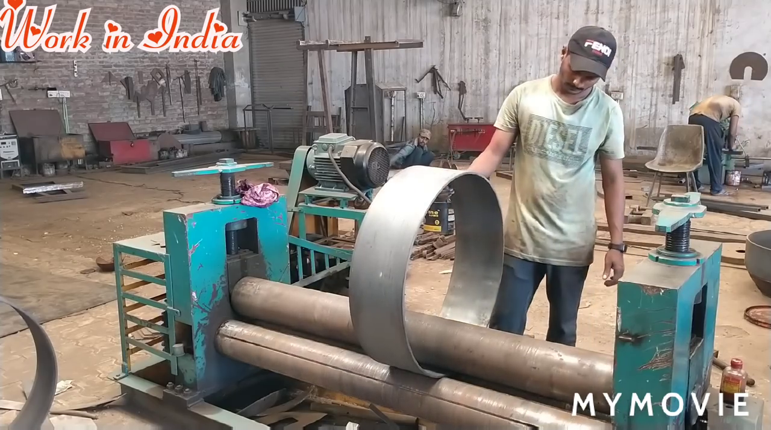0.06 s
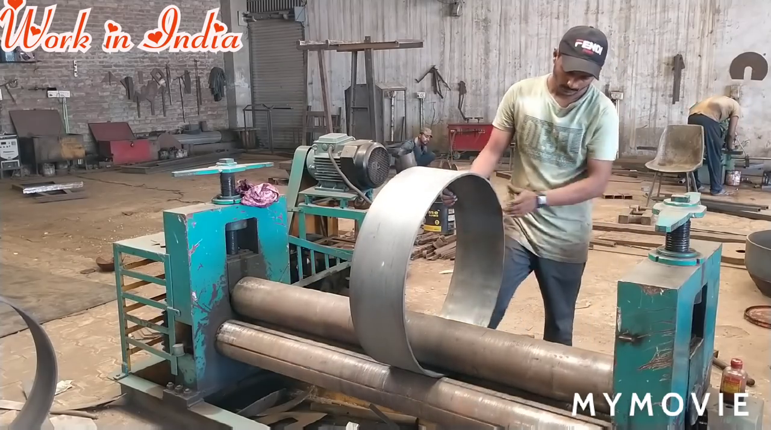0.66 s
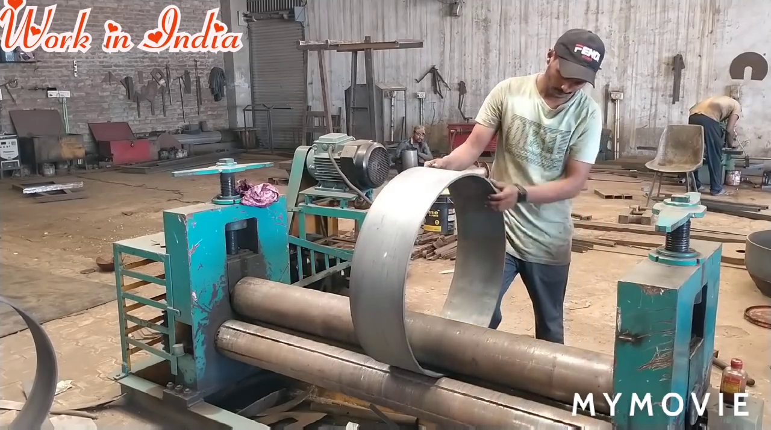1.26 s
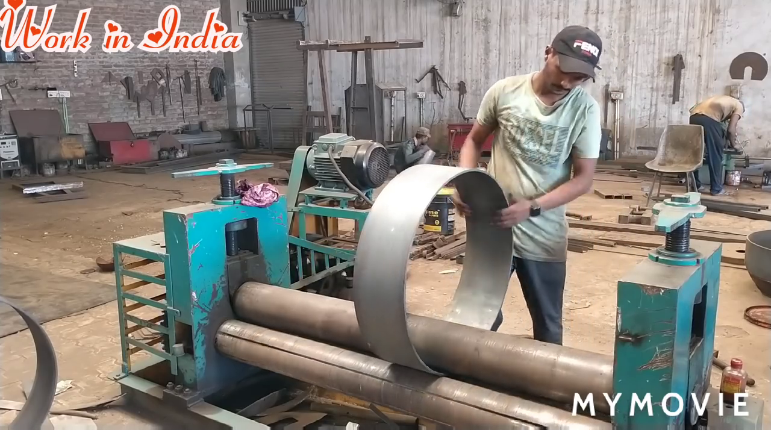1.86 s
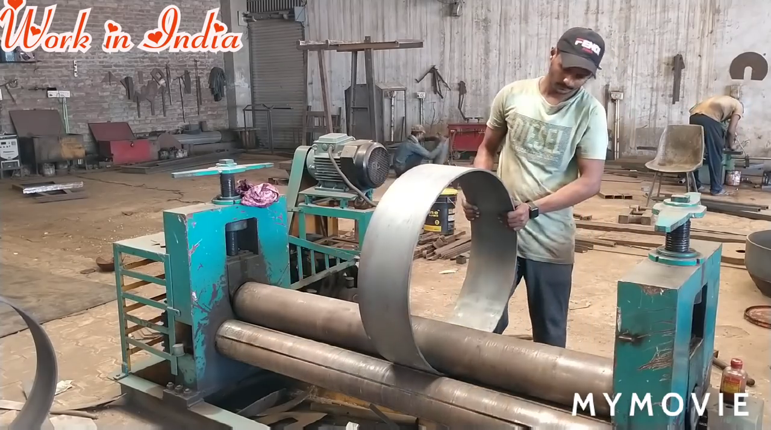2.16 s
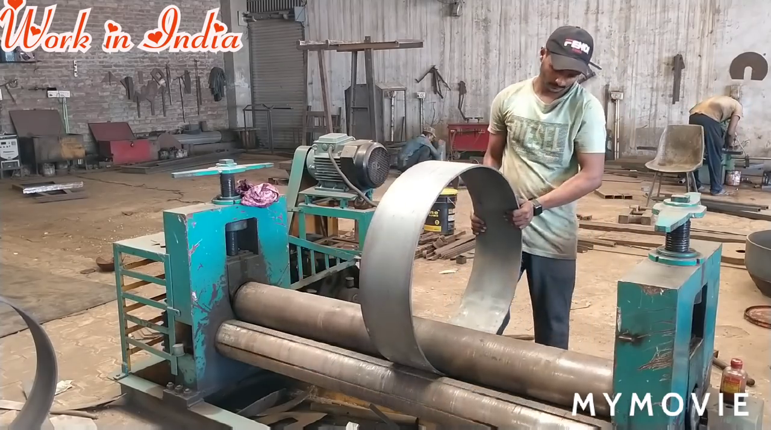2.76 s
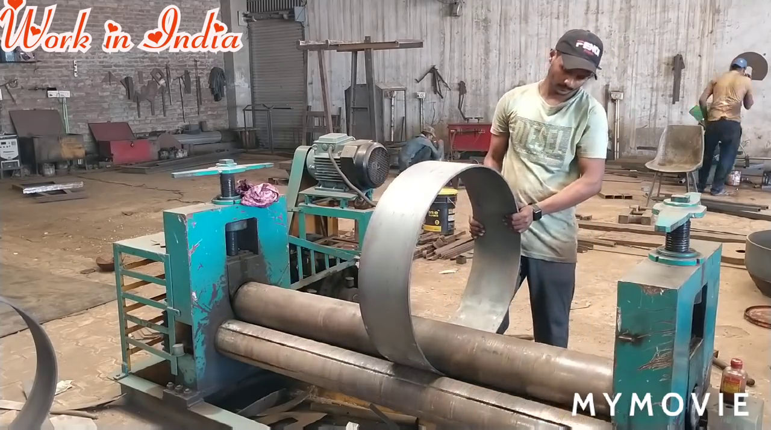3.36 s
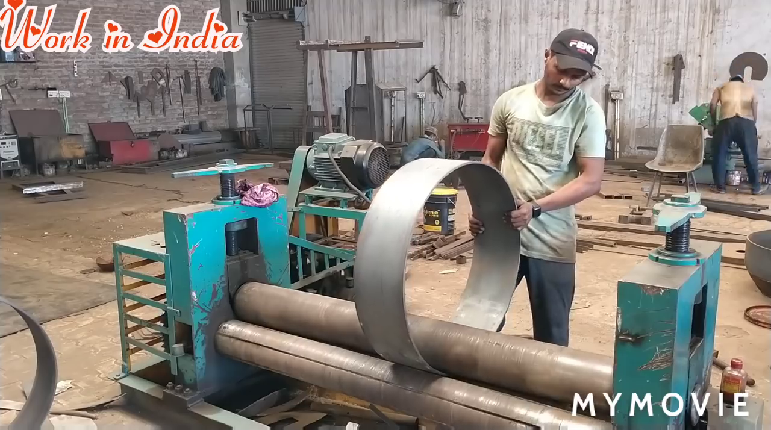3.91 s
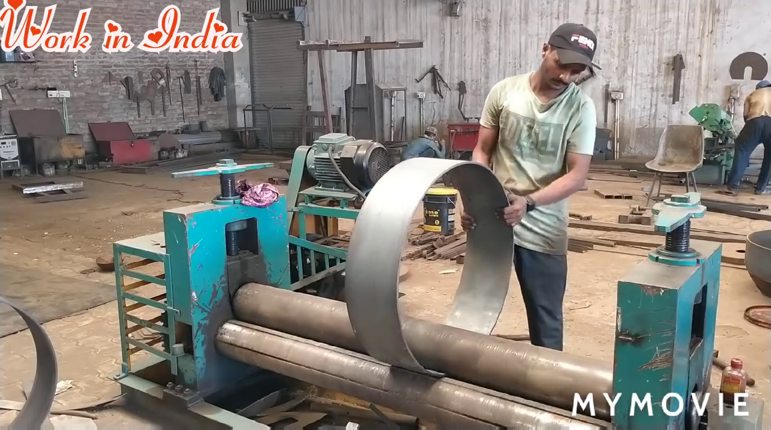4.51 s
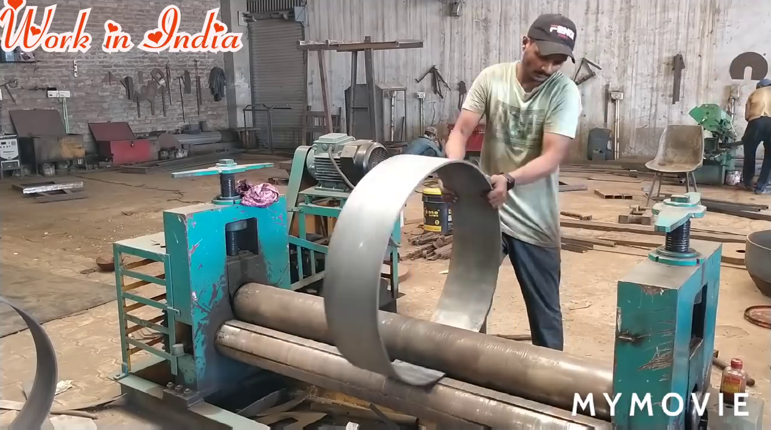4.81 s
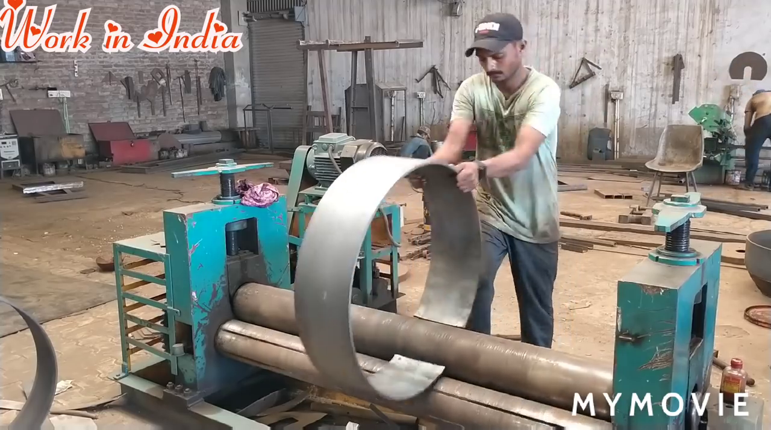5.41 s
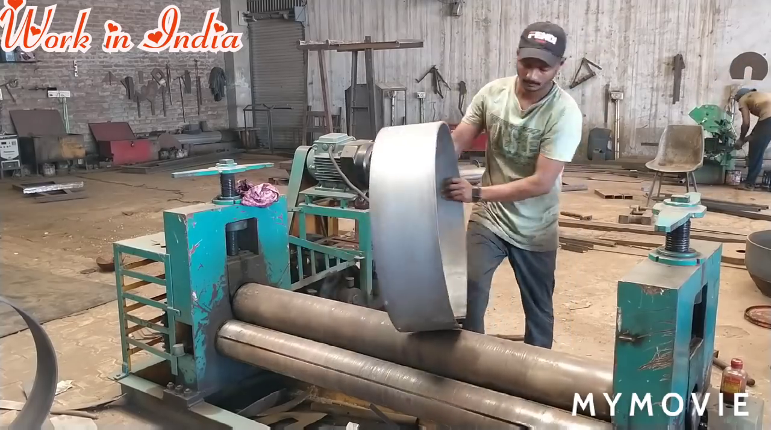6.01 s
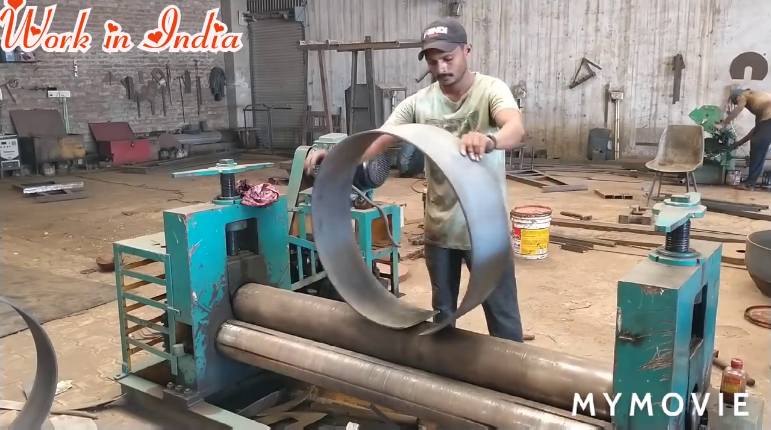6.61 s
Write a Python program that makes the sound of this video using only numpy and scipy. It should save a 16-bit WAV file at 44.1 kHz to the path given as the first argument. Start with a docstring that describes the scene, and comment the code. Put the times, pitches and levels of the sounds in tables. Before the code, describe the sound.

In a large, reverberant workshop, a steel bar clinks and rattles lightly several times. After a short pause, sheet and plate steel clatter in a louder run of ringing clanks. A steel hoop then knocks on machine rollers with a dull thud, bangs against them again, and is dragged round with thin, high, stuttering squeaks. Distant machinery hums faintly throughout, all heard in mono.

```python
"""Steel stock clanks in quick runs as it is dropped and stacked in a fabrication workshop.
Each impact excites the normal modes of the piece, which chatters and then rings in damped free vibration.
A rolled hoop knocks on the bending rollers, drops onto them and is dragged round, squealing thinly by
stick-slip friction. A large shed adds its diffuse reverberation over a low machine hum."""
import sys
import numpy as np
from scipy import signal
from scipy.fft import rfft, irfft
from scipy.io import wavfile
from scipy.ndimage import uniform_filter1d, minimum_filter1d

SR = 44100
rng = np.random.default_rng(int(sys.argv[2]) if len(sys.argv) > 2 else 0)


def master_out(mix):
    """Clip the mix to full scale and print it as 16-bit PCM to the path in sys.argv[1]."""
    frames = np.transpose(np.atleast_2d(mix))
    ceiling = np.clip(frames, -1, 1)
    pcm = np.round(ceiling * 32767).astype(np.int16)
    wavfile.write(sys.argv[1], SR, pcm)


N = 294572
TIME = np.arange(N) / SR
BLOW = TIME[:2 ** 15]  # time axis of one impact, t/s
ATTACK_S = .0115

# Strongest normal modes of each piece: f/Hz, relative level/dB
BAR_MODES = [(1073, -17.5), (2106, -10.5), (2614, 2.5), (3035, -19), (3281, -13), (3524, -12), (3560, -4),
             (5195, -9.5), (5313, -5.5), (6397, -21), (7563, -15), (7639, -15), (8107, -20), (8482, -16)]
STRIP_MODES = [(1851, -16.5), (2062, -12), (2110, -10.5), (2414, -11.5), (2609, -8.5), (3033, -5.5),
               (3073, -10), (3515, -4.5), (3559, -1.5), (4358, -14), (4870, -11), (5204, -10.5),
               (5848, -18.5), (6388, -13)]
SHEET_MODES = [(527, -12), (561, -14), (1248, -4), (1694, -6), (1727, -5.5), (1914, -4), (2172, -2),
               (2208, -3), (2502, -8), (2621, -5), (2855, -14), (3333, -1.5), (3594, -5), (4814, -6.5),
               (5150, -6.5), (5967, -12.5), (6353, -10), (6838, -5.5), (6877, -9.5), (6918, -8),
               (7503, -1.5), (7709, -6), (7760, -9), (8239, -14), (8523, -11.5), (9145, -10)]
PLATE_MODES = [(889, -10), (1480, 3), (1565, -2.5), (1620, -3), (1813, -2), (1862, -16), (2117, -0.5),
               (2225, -12), (2401, -14), (2431, -8.5), (2706, -7.5), (2781, -6), (2916, -8.5), (3119, -13),
               (3447, -3.5), (3502, -9), (3560, -7.5), (3736, -13.5), (4251, -9), (4394, -9.5), (5631, -21),
               (6556, -17)]
ROLLER_MODES = [(315, -30), (560, -11), (684, -7), (870, -6), (1164, 0), (1264, -4.5), (1561, -16),
                (1631, -9), (1699, -11), (1731, -0.5), (1961, -13), (2450, -19), (2601, -8), (3238, -16),
                (3403, -15), (3670, -22), (4567, -19), (5249, -26)]
HOOP_MODES = [(634, -22), (1136, -15.5), (1579, -18.5), (1617, -2.5), (1880, -7.5), (1938, -13),
              (2246, -11), (2281, -2.5), (2475, -3.5), (2594, -16), (2637, -11), (2669, 0), (2794, -3.5),
              (2862, -5), (3100, -13), (3248, -8.5), (3386, -9.5), (3550, -12), (3579, -16), (3813, -8.5),
              (3932, -10), (4322, -16), (4510, -16.5), (5413, -20), (5700, -26), (6280, -17.5), (6633, -21),
              (7310, -14), (7612, -14), (7661, -22)]
# Continuum of weak, overlapping modes of each piece: f/Hz, relative spectral level/dB
BAR_CONTINUUM = [(100, -22.5), (250, -13.5), (550, -16.5), (1000, -23), (1600, -13), (2400, -1.5),
                 (3500, 0), (5000, -8.5), (7500, -4.5), (9500, -16), (12000, -34.5), (15000, -46)]
STRIP_CONTINUUM = [(100, -45.5), (250, -25), (550, -19), (1000, -16.5), (1600, -15.5), (2400, -9.5),
                   (3500, -0.5), (5000, -16), (7500, -7), (9500, -20.5), (12000, -46.5), (15000, -52)]
SHEET_CONTINUUM = [(100, -44.5), (250, -21), (550, -4.5), (1000, -5), (1600, -5.5), (2400, -6.5),
                   (3500, -1), (5000, -6), (7500, -6.5), (9500, -18), (12000, -35), (15000, -48.5)]
PLATE_CONTINUUM = [(100, -34), (250, -19), (550, -4), (1000, -9), (1600, -9.5), (2400, 2.5), (3500, -3.5),
                   (5000, -5.5), (7500, -4.5), (9500, -15), (12000, -36), (15000, -48.5)]
ROLLER_CONTINUUM = [(100, -47), (250, -17), (550, -6.5), (1000, -23), (1600, 2), (2400, 1), (3500, -4),
                    (5000, -11), (7500, -10.5), (9500, -21.5), (12000, -38), (15000, -47)]
HOOP_CONTINUUM = [(100, -26.5), (250, -28), (550, -15.5), (1000, -7), (1600, -8.5), (2400, 1), (3500, -2.5),
                  (5000, -7.5), (7500, -9.5), (9500, -20.5), (12000, -42), (15000, -51)]
STEEL = {"bar": (BAR_MODES, BAR_CONTINUUM), "strip": (STRIP_MODES, STRIP_CONTINUUM),
         "sheet": (SHEET_MODES, SHEET_CONTINUUM), "plate": (PLATE_MODES, PLATE_CONTINUUM),
         "roller": (ROLLER_MODES, ROLLER_CONTINUUM), "hoop": (HOOP_MODES, HOOP_CONTINUUM)}


def clank(piece, crash_db, ring_db, bass_db, treble_db, chatter, t60, rattle_db=1.58, bounce_db=1.31):
    """Modal superposition: dense weak modes merge into a crash, and the strong modes ring through it."""
    modes, continuum = STEEL[piece]
    size = len(BLOW)
    tilt = [(500, bass_db), (2500, 0), (7500, treble_db)]  # set by the place and hardness of contact
    grid_hz = np.arange(0, SR / 2, 55)
    ripple_db = 5 * rng.standard_normal(len(grid_hz))  # peaks and valleys of the weak modes
    crash = noise(
        lambda f: spectrum_db(continuum, f) + spectrum_db(tilt, f) + np.interp(f, grid_hz, ripple_db),
        size)
    crash = butterworth(crash, 4, 115, "high")  # thin steel radiates hardly any deep bass
    ring = unit(sum(amp(db + spectrum_db(tilt, hz)) * mode(hz) for hz, db in modes))
    rattle = amp(rattle_db * wander(300, size))
    bounce = amp(bounce_db * wander(90, size))
    rise = ATTACK_S + .035 * chatter  # a piece that chatters longer settles more slowly
    crash = damp(unit(crash * rattle), rise, chatter, t60)
    ring = damp(ring, rise, chatter, 1.12 * t60)
    return (amp(crash_db) * crash + amp(ring_db) * ring) * bounce


def damp(x, rise, chatter, t60, treble_t60_ratio=.82):
    """Frequency-dependent damping: the shortest bending waves die first."""
    body = signal.sosfiltfilt(signal.butter(2, 5000, fs=SR, output="sos"), x)
    treble = (x - body) * envelope(BLOW, rise, chatter, t60 * treble_t60_ratio)
    return body * envelope(BLOW, rise, chatter, t60) + treble


# Impacts of steel on steel: piece, t/s, crash level/dB, ring level re crash/dB, bass tilt/dB,
# treble tilt/dB, chatter/s, T60/s, f/Hz picked out by a grazing edge (None for a flat landing)
IMPACTS = [ ("bar", 0.000, -38.5, -7, 0, -12, .007, .22, 4320),
           ("bar", 0.042, -37.5, 4.5, 1, -7, .13, .105, 6620),
           ("bar", 0.409, -36.5, 5, 2.5, 2.5, .03, .39, 4400),
           ("bar", 0.601, -35.5, 2, 0, -10, .14, .17, 3430),
           ("bar", 0.832, -28.5, 3.5, -1, 6.4, .11, .21, None),
           ("bar", 1.130, -29.5, -3, -1, -2, .25, .17, 3480),
           ("strip", 2.256, -24, 5, 6.5, 1, .012, .47, None),
           ("sheet", 2.476, -17.5, -1, -1.5, 0, .34, .21, None),
           ("plate", 3.066, -26.5, 5.5, -1, 0, .042, .28, None),
           ("plate", 3.281, -20, 3, -6, 0, .09, .27, None),
           ("plate", 3.495, -31.5, -11, -2, 15, .018, .29, 4330),
           ("roller", 4.391, -33.5, -2, -7, 3, .008, .6, 4360),
           ("roller", 4.475, -20.5, 1.3, 9.5, 1, .004, .29, 830),
           ("sheet", 4.627, -34, -4, -3.5, -6, .005, .25, 5250),
           ("plate", 4.694, -23.5, -8, -12, -1.5, .003, .125, 4260),
           ("hoop", 4.996, -41.5, -9, -1, -8, .02, .16, 2350),
           ("hoop", 5.334, -28, -7, 3, -5, .075, .085, None),
           ("roller", 5.380, -31, 1, 0, -13, .004, .09, None),
           ("hoop", 5.419, -22, -.5, 5, -1, .006, .2, 2680),
           ("roller", 5.418, -27, 4, 3, -5, .006, .14, None),
           ("hoop", 5.695, -20, 4.7, 9, .5, .18, .32, None),
           ("hoop", 5.742, -19, -.5, 5, 1.5, .058, .16, None), ]


def landings(graze_db=-3.5, graze_q=21, sing_db=-10.5):
    """Impact excitation: each landing clanks, a grazing edge adds a resonance, and the bar sings on."""
    out = np.zeros(N)
    for piece, start, db, ring_db, bass_db, treble_db, chatter, t60, graze_hz in IMPACTS:
        add(out, start, clank(piece, db, db + ring_db, bass_db, treble_db, chatter, t60))
        if graze_hz:
            add(out, start, amp(db + graze_db) * resonance(graze_hz, graze_hz / graze_q, chatter, t60))
        if piece == "bar":
            singing = resonance(hz=5290, width_hz=100, hold=.025, t60=.4)
            add(out, start, amp(db + ring_db + sing_db) * singing)
    return out


# Fast and slow decay of the bar's lowest mode: level re ring/dB, T60/s
DECAY_STAGES = [(-18, .6), (-39.5, 10)]


def bar_aftersound():
    """Energy summation: every landing of the bar feeds its lowest mode, which decays in two stages."""
    power = np.zeros(N)
    for piece, start, db, ring_db, *_ in IMPACTS:
        if piece == "bar":
            for stage_db, t60 in DECAY_STAGES:
                add(power, start, (amp(db + ring_db + stage_db) * envelope(TIME, ATTACK_S, 0, t60)) ** 2)
    return np.sqrt(power) * tone(hz=1077)


# Frequency response of the hoop's edge: f/Hz, relative level/dB
EDGE_SPECTRUM = [(1500, -44), (4700, -28.5), (5300, -24), (5750, -33), (6300, -23), (6800, -12),
                 (7250, 0.5), (7700, 3), (8200, -9), (9500, -23), (11500, -34), (15500, -37)]


def edge_response(size=1024):
    """Minimum-phase impulse response: the causal ring of the hoop's edge, with unit energy."""
    magnitude = amp(spectrum_db(EDGE_SPECTRUM, np.fft.rfftfreq(size, 1 / SR)))
    cepstrum = irfft(np.log(magnitude))
    cepstrum[1:size // 2] *= 2  # fold onto positive time
    cepstrum[size // 2 + 1:] = 0
    ring = irfft(np.exp(rfft(cepstrum)))
    return ring / np.sqrt(np.sum(ring ** 2))


# Larger slips of the hoop's edge on the roller: t/s, level/dB
HOOP_SLIPS = [(6.3634, -28), (6.4263, -19), (6.4887, -19), (6.5181, -18), (6.5465, -18), (6.6214, -20),
              (6.6503, -21)]


def hoop_drag(onset_s=6.275, swell_s=.17, swell_db=18, creep_db=-38, rebound_s=.0103):
    """Stick-slip friction: fine creep drives the edge; larger slips squeak, skitter and ring the hoop."""
    swell = np.clip((TIME - onset_s) / swell_s, 0, 1)
    friction = rng.standard_normal(N) * (TIME > onset_s)
    grain_db = 2 * wander(300, N)
    creep = friction * amp(creep_db + swell_db * (swell - 1) + grain_db)
    out = signal.fftconvolve(creep, edge_response())[:N]
    for first, slip_db in HOOP_SLIPS:
        for start, db in (first, slip_db), (first + rebound_s, slip_db - 6):  # catches and slips again
            squeak = mode(hz=7430, width_hz=400) * envelope(BLOW, rise=.001, hold=.00085, t60=.016)
            hiss = unit(butterworth(rng.standard_normal(len(BLOW)), 2, [6000, 9300], "band"))
            skitter = hiss * envelope(BLOW, rise=.00091, hold=.00062, t60=.082)
            add(out, start, amp(db - 5.5) * squeak + amp(db - 21) * skitter)
        add(out, first, amp(slip_db - 35) * resonance(hz=5300, width_hz=250, hold=0, t60=.2))
    return out


# Squeaks of sliding edges: t/s, f/Hz, level/dB, hold/s
EDGE_SQUEAKS = [(0.235, 4500, -44, .015), (2.750, 3400, -43, .02), (3.495, 8150, -28, .055),
                (3.705, 7540, -37.5, .06), (3.705, 4270, -55, .05)]


def squeaks(q=18):
    """Frictional excitation: a sliding edge drives one narrow resonance."""
    out = np.zeros(N)
    for start, hz, db, hold in EDGE_SQUEAKS:
        add(out, start, amp(db) * resonance(hz, hz / q, hold, t60=.2))
    return out


# Dull, hollow knocks: t/s, f/Hz, level/dB
HOLLOW_KNOCKS = [(1.728, 359, -59), (2.04, 653, -49), (4.394, 470, -40), (5.182, 832, -41),
                 (5.416, 638, -26)]


def knocks():
    """Damped oscillation: each knock is a single low mode that dies quickly."""
    out = np.zeros(N)
    for start, hz, db in HOLLOW_KNOCKS:
        add(out, start, amp(db) * mode(hz) * envelope(BLOW, ATTACK_S, hold=.009, t60=.095))
    return out


# Heavy blows on the roller frame, from a roller landing at 4.475 s and the dropped hoop at 5.775 s: t/s,
# level/dB
FRAME_BLOWS = [(4.475, -31), (5.775, -39)]
# Resonances of the frame: f/Hz, bandwidth/Hz, level re blow/dB, T60/s
FRAME_MODES = [(100, 50, -19, .2), (155, 40, -7, .17), (280, 120, -1.5, .15), (420, 140, -1.5, .16)]


def frame_thuds():
    """Structural resonance: heavy blows of the roller and the hoop shake the broad, low modes of the roller
    frame."""
    out = np.zeros(N)
    for start, db in FRAME_BLOWS:
        for hz, width_hz, mode_db, t60 in FRAME_MODES:
            add(out, start, amp(db + mode_db) * resonance(hz, width_hz, hold=.009, t60=t60))
    return out


# Reverberation bands of the shed: f/Hz, T60/s, level/dB
SHED_BANDS = [(119.9, 1.3, -4.5), (250, 1.4, -17), (700, 1.4, -24), (2000, 1.0, -36), (6000, 0.65, -45.5)]


def shed_reverb(x):
    """Diffuse field: dense reflections decay exponentially, longest and strongest at low frequencies."""
    t = TIME[:2 * SR]
    tail = 0
    for hz, t60, db in SHED_BANDS:
        band = butterworth(rng.standard_normal(len(t)), 2, [hz / 1.7, hz * 1.7], "band")
        decay = envelope(t, rise=.038, hold=.02, t60=t60)
        tail = tail + amp(db) * band * decay / np.sqrt(np.sum(decay ** 2))
    return signal.fftconvolve(x, tail)[:N]


# Continuous spectrum of the machinery: f/Hz, relative spectral level/dB
MACHINE_SPECTRUM = [(18, -89), (30, -52), (167, -9), (328, -12), (364, -7), (404, -11.5), (552, -9.5),
                    (978, -11), (1060, -4), (1140, -12), (1300, -8.5), (2990, -19.5), (7630, -24),
                    (15000, -53.5)]
# Its line spectrum: f/Hz, level/dB
MACHINE_LINES = [(2113, -73)]
# Background rumble ducking and swelling, as under automatic gain control or noise suppression:
# t/s, level/dB
BACKGROUND_LEVEL = [(0, -52.5), (1.35, -50.5), (1.65, -60.5), (2.2, -58.7), (3.8, -55), (4.15, -61.5),
                    (4.35, -56), (4.9, -58), (6.68, -56)]


def machinery():
    """Broadband noise plus a line spectrum: distant machines rumble under a faint tone."""
    rumble = noise(lambda f: spectrum_db(MACHINE_SPECTRUM, f), N)
    level_db = np.interp(TIME, *np.transpose(BACKGROUND_LEVEL)) + .8 * wander(14, N)
    return rumble * amp(level_db) + sum(amp(db) * tone(hz) for hz, db in MACHINE_LINES)


def mode(hz, width_hz=22, beat_db=3.0, hop=64):
    """Line broadening: shifting contacts jostle the phase of a mode of rms 1 and make it beat."""
    ticks = BLOW[::hop]
    kicks = rng.standard_normal(len(ticks)) * np.sqrt(2 * np.pi * width_hz * hop / SR)
    phase = np.interp(BLOW, ticks, np.cumsum(kicks) + 2 * np.pi * rng.random())
    beating = amp(beat_db * wander(55, len(BLOW)))
    return unit(beating * np.sin(2 * np.pi * hz * BLOW + phase))


def resonance(hz, width_hz, hold, t60, rise=.0095):
    """Forced vibration: noise drives one resonance, and little radiates far below it."""
    def response_db(f):
        detuning = 1 + (1.5 * (f - hz) / width_hz) ** 2
        bass_loss = 1 + (.5 * hz / (f + 1)) ** 4
        return -20 * np.log10(detuning * bass_loss)
    return noise(response_db, len(BLOW)) * envelope(BLOW, rise, hold, t60)


def tone(hz, waver_db=1.7):
    """Random modulation: a sinusoid wavers in level and phase."""
    return amp(waver_db * wander(8.4, N)) * unit(np.sin(2 * np.pi * hz * TIME + .5 * wander(15, N)))


def envelope(t, rise, hold, t60):
    """Exponential decay, after a build-up and a rounded hold; all times in seconds."""
    free_time = np.hypot(np.maximum(t - rise, 0), hold) - hold
    return np.minimum(t / rise, 1) ** 1.5 * amp(-60 * free_time / t60)


def noise(shape_db, size):
    """Spectral shaping: noise of rms 1 whose level/dB is a function of f/Hz."""
    hz = np.fft.rfftfreq(size, 1 / SR)
    return unit(irfft(rfft(rng.standard_normal(size)) * amp(shape_db(hz)), size))


def spectrum_db(points, hz):
    """Interpolation of (f/Hz, level/dB) points on a log-frequency axis."""
    f, db = np.transpose(points)
    return np.interp(np.log(hz + 1), np.log(f), db)


def wander(rate, size):
    """Random fluctuation: `rate` normal values a second, joined by straight lines."""
    return np.interp(TIME[:size] * rate, np.arange(4096), rng.standard_normal(4096))


def butterworth(x, order, hz, kind):
    """Filtering with a maximally flat passband."""
    return signal.sosfilt(signal.butter(order, hz, kind, fs=SR, output="sos"), x)


def amp(db):
    """Level/dB to amplitude ratio."""
    return 10 ** (db / 20)


def unit(x):
    """Normalisation to rms 1."""
    return x / np.sqrt(np.mean(x ** 2) + 1e-20)


def add(track, start, sound):
    """Superposition of a sound on the track at `start` seconds."""
    i = int(start * SR)
    track[i:i + len(sound)] += sound[:N - i]


def scene():
    """Linear superposition of the steel, its reverberation and the machinery, in one channel."""
    steel = landings() + squeaks() + knocks() + frame_thuds() + hoop_drag()
    return (steel + shed_reverb(steel) + bar_aftersound() + machinery())[None]


def record(dry, ceiling=.62, window_s=.004, top_hz=15700):
    """Band and peak limiting: the deep bass is thinned, the highest peaks held down and the top cut."""
    thin = butterworth(dry, 2, 62, "high")
    span = int(window_s * SR)
    needed_gain = ceiling / np.maximum(abs(thin), ceiling)
    gain = uniform_filter1d(minimum_filter1d(needed_gain, span), span)
    return signal.sosfilt(signal.ellip(10, .2, 80, top_hz, fs=SR, output="sos"), thin * gain)


dry = scene()
out = record(dry)
master_out(out)
```